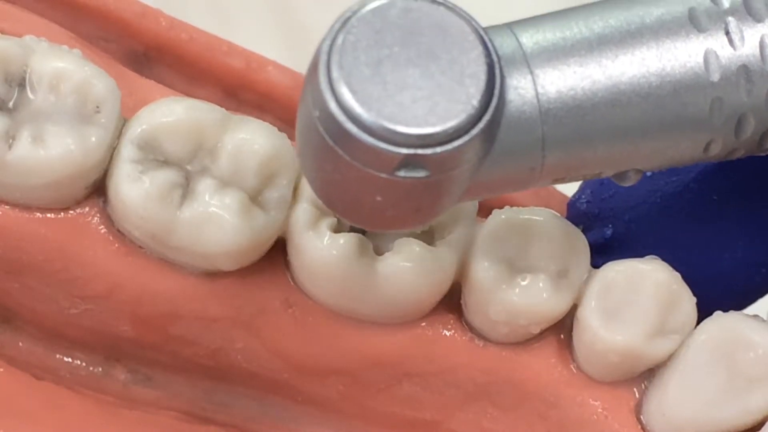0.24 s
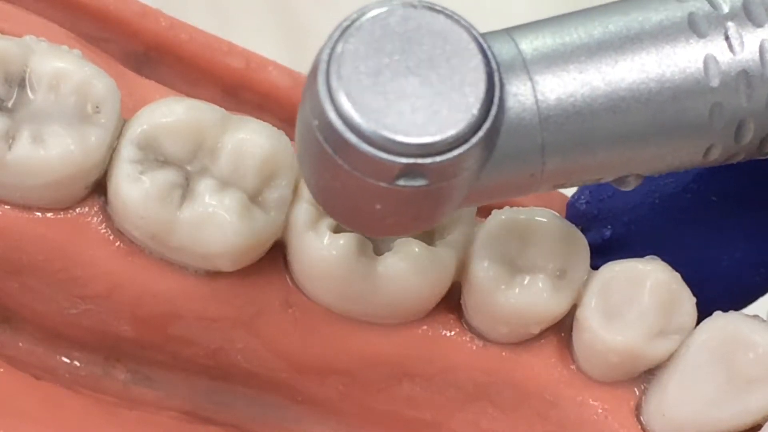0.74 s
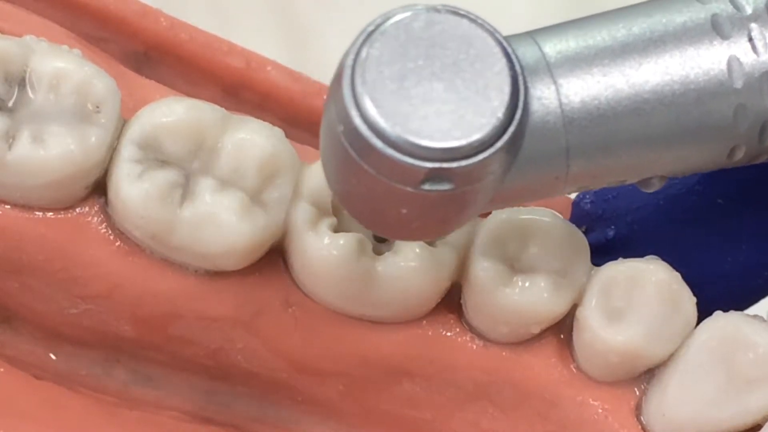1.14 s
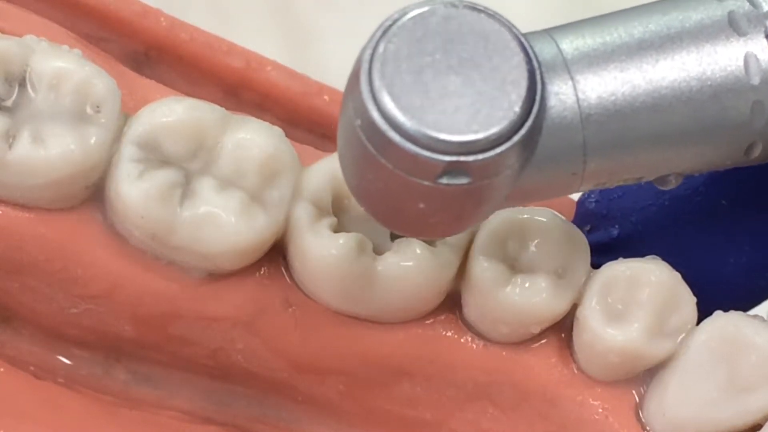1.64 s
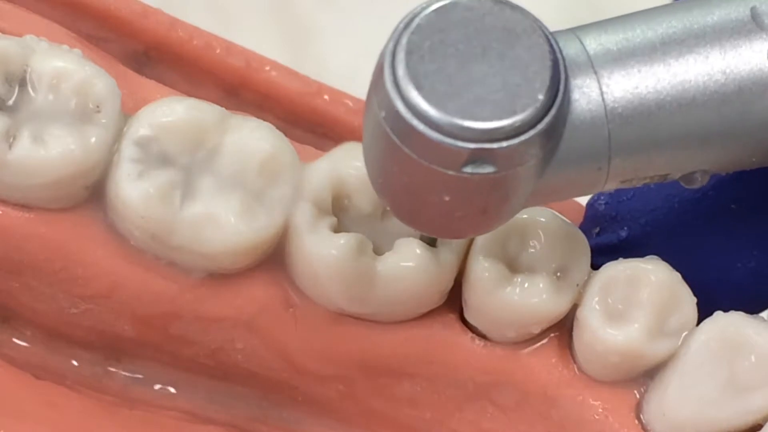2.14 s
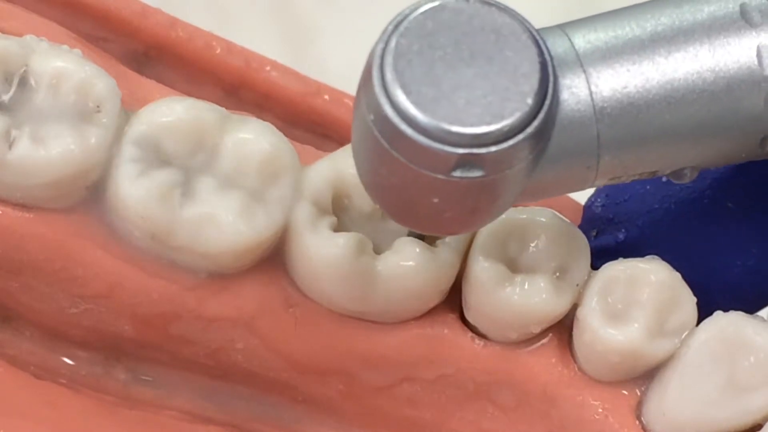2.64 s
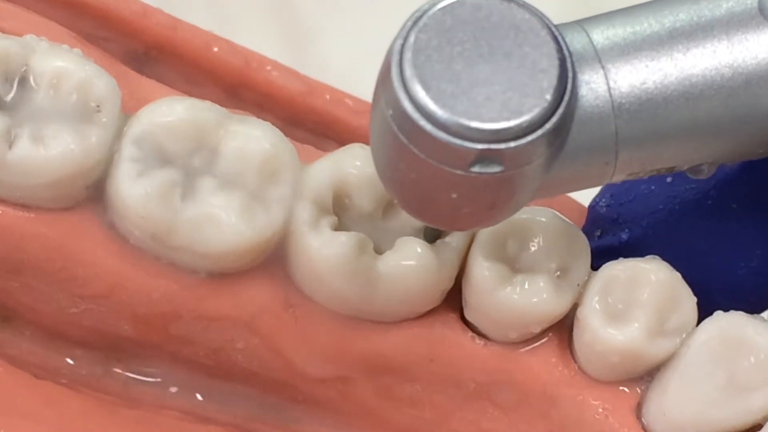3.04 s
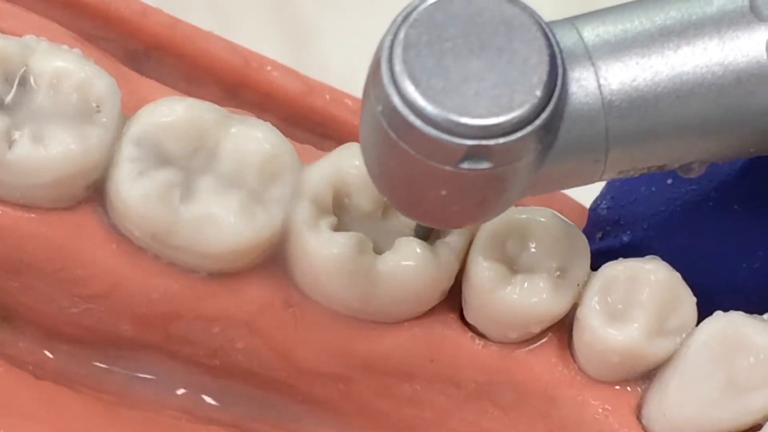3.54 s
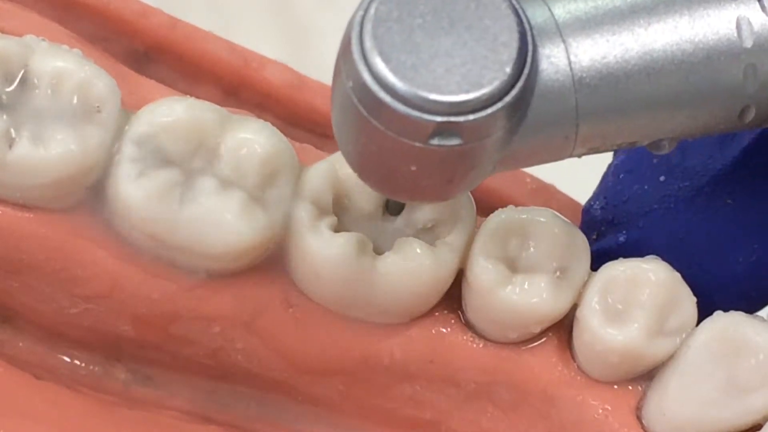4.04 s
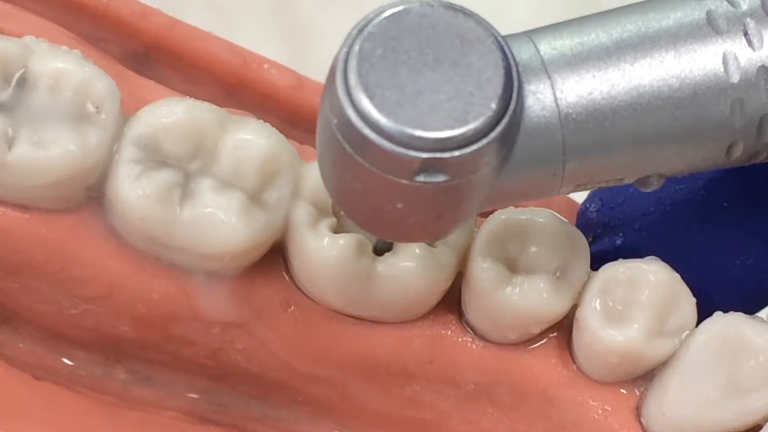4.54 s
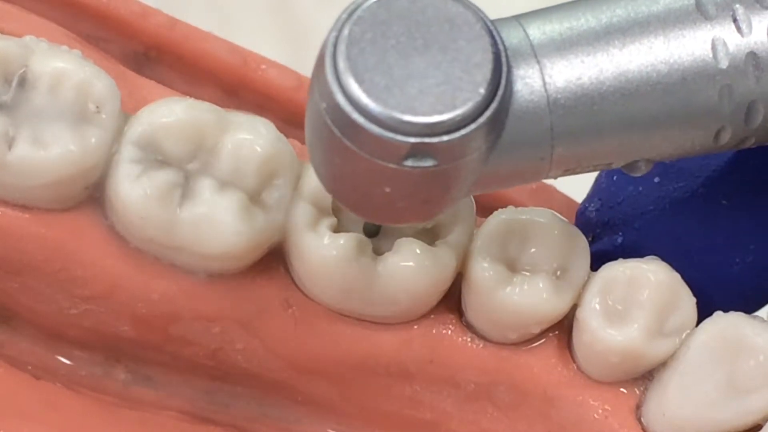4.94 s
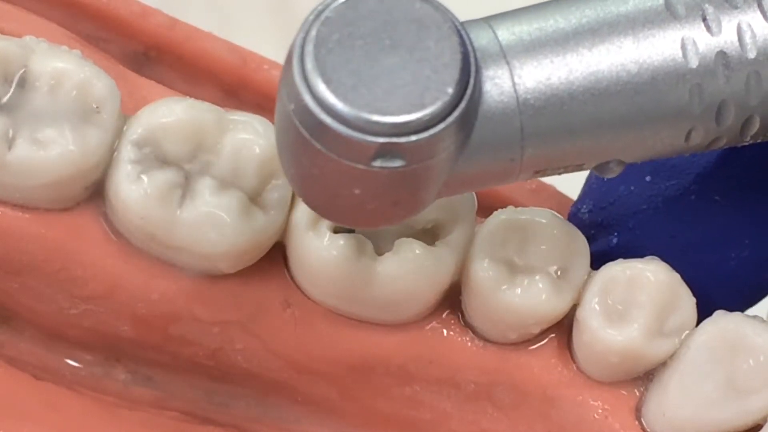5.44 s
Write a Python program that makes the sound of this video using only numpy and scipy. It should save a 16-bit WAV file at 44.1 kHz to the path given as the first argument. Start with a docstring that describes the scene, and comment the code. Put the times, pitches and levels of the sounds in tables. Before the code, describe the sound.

Close, wavering high whine of a dental handpiece over spray hiss, with two bright air blasts and bursts of thumping, crackling wind noise.

```python
"""Close beside a plastic tooth, ground by an electric dental handpiece: sines on multiples of the motor speed,
which sags under load, over shaped-noise hiss of bur and cooling spray. An air jet blows twice beside it:
bright noise, its stream buffeting the single microphone with low rumble, flutter and sharp pressure pulses.
Gain control ducks the whole mix when it is loud.
"""
import sys
import numpy as np
from scipy import signal
from scipy.fft import rfft, irfft
from scipy.io import wavfile
from scipy.ndimage import uniform_filter1d, minimum_filter1d

SR = 44100
rng = np.random.default_rng(int(sys.argv[2]) if len(sys.argv) > 2 else 0)


def put_to_file(sound):
    """Save the sound as 16-bit audio at rate SR, in the file named by the first command-line argument."""
    columns = np.atleast_2d(sound).T  # one column per channel
    safe = np.clip(columns, -1, 1)
    whole_steps = np.round(safe * 32767)
    wavfile.write(sys.argv[1], SR, whole_steps.astype(np.int16))


N = 250929

# Levels are set ahead of the microphone chain. Colours are relative density; the noise is scaled to rms 1.
# Slowly changing background air rumble on the microphone: t/s, rms level/dB
DRAUGHT = [(0, -34.5), (.65, -36), (.7, -44), (.8, -39), (1.3, -39.5), (1.7, -41), (2.0, -46.5),
           (2.34, -53), (3.0, -42), (3.2, -36), (3.6, -28), (4.1, -34), (4.4, -37), (5.0, -35), (5.69, -41)]
# Gusts of the stream across the microphone: middle t/s, length/s, rumble level/dB, flutter level/dB
GUSTS = [(0.081, 0.091, -35, -38), (0.338, 0.097, -28.5, -36), (0.461, 0.021, -29, -24.5),
         (.55, 0.028, -30, -35), (0.612, 0.072, -29.5, -44), (3.052, 0.025, -23, -39),
         (3.144, 0.073, -26.5, -33.5), (3.268, 0.016, -40, -15), (3.406, .1, -19, -28),
         (3.481, 0.038, -31, -28), (3.587, 0.064, -21, -34), (3.67, 0.11, -28, -30),
         (3.728, 0.053, -21, -14.5), (3.778, 0.07, -31, -16), (3.865, 0.028, -33, -29.5),
         (3.95, .05, -35, -24), (3.998, 0.12, -35, -31), (4.177, 0.041, -21.5, -20.5),
         (4.256, 0.082, -24, -19.5), (4.47, 0.046, -33, -34), (4.993, .04, -32.5, -47),
         (5.12, .06, -32.5, -54), (5.48, 0.079, -32.5, -49), (5.566, 0.092, -29, -44),
         (5.662, .08, -25, -28)]
# Rumble spectrum: f/Hz, density/dB
RUMBLE_COLOUR = [(15, -70), (25, -40), (35, -52), (51, -10.5), (97, 2), (160, -2), (464, -28), (500, -54),
                 (650, -59), (1100, -120)]
# Strongest eddies striking the diaphragm, ahead of venting: t/s, peak level/dB, nominal width/ms
POPS = [(.059, -8, 1.34), (0.067, -11.5, 0.57), (.099, -13, 0.74), (.124, -18, 1.1), (.155, -18, 0.63),
        (.204, -18.5, 0.43), (.247, -14.5, 1.28), (.306, -8, 0.54), (0.322, -11.5, 0.57), (.36, -10.5, 1.3),
        (0.37, -10.5, 0.52), (.46, -4.5, 0.6), (0.5, -15.5, 0.78), (.545, -13, 0.59), (.624, -5, 0.49),
        (3.05, -11, 1.09), (3.118, -19, 1.16), (3.134, -19, 1.8), (3.162, -0.5, 0.79), (3.263, -5, 0.85),
        (3.32, -14.5, 1.7), (3.353, -7.5, 0.94), (3.376, -15, 0.54), (3.395, -10, 0.64),
        (3.407, -0.5, 0.37), (3.415, -10, 0.52), (3.431, -1.5, 0.39), (3.48, -7, 1.22), (3.488, -7.5, 0.33),
        (3.564, -11, 0.63), (3.582, -5, 0.86), (3.604, -1, 0.32), (3.612, -7, 0.96), (3.638, -6, 0.75),
        (3.65, 4.5, .3), (3.665, -1, 0.63), (3.678, -3.5, 0.44), (3.707, -3, 0.35), (3.714, -1.5, 0.51),
        (3.718, -0.5, 0.37), (3.728, -18, 1.1), (3.736, -1.5, 0.48), (3.739, -15, .64), (3.747, -11, 0.42),
        (3.75, -7, 0.89), (3.759, -5, 0.2), (3.771, 2.5, 0.39), (3.777, 3, 0.65), (3.786, -0.5, 0.25),
        (3.795, -0.5, 0.74), (3.807, -12, 0.59), (3.816, -14, 0.55), (3.859, -8.5, .76), (3.932, -5, 1.04),
        (3.951, -20, 0.63), (3.958, -9, 0.55), (3.992, -8, 0.5), (4.014, -8, 0.74), (4.029, -9.5, 1.34),
        (4.054, -7, 0.39), (4.088, -15, 1.5), (4.155, -18, .95), (4.17, -7.5, 1.4), (4.188, 0, 0.21),
        (4.208, -17, .9), (4.223, -6, 0.38), (4.226, 6.5, 0.48), (4.233, -3, 0.88), (4.237, 2, 0.42),
        (4.242, -11, 0.66), (4.251, 1.5, 0.33), (4.263, -4, 0.33), (4.272, -9, 0.34), (4.276, 3, 0.4),
        (4.28, 3, 0.35), (4.285, 6.5, .2), (4.288, -1, 0.36), (4.46, -16.5, 1.2), (4.485, -36, 1.5),
        (5.562, -10.5, 1.08), (5.637, -4.5, 0.78), (5.649, -8, 1.66), (5.671, -2, .46), (5.688, 1.5, 0.43)]
# Air jet, one sub-table a blast: t/s, level/dB, extra level of its lower part/dB
JET_BLASTS = [
    [(0.0, -24, -1), (0.16, -21, -0.5), (0.647, -22, 2.5)],
    [(3.03, -21, 6), (3.07, -22, 1), (3.13, -22, 4.5), (3.78, -23, 0.5), (4.1, -22, 2), (4.33, -22.5, 3),
     (4.52, -20.5, 0.5), (5.61, -19.5, -4), (5.69, -19.5, -4)],
]
# Jet spectrum: f/Hz, density/dB
JET_COLOUR = [(1500, -32), (3000, -13), (5000, -9.5), (6500, -5.5), (8000, -8.5), (9600, -2), (11000, -1.5),
              (12500, 0.5), (14000, 0.5), (15000, -2), (16500, 11)]
# Bur and spray hiss, dipping as the jet shuts: t/s, rms level/dB
SPRAY_LEVEL = [(0, -33.5), (.5, -33), (.65, -36.5), (.76, -36.5), (.85, -34), (2.6, -34.5), (5.69, -31.5)]
# Spray spectrum: f/Hz, density/dB
SPRAY_COLOUR = [(150, -39), (250, -11), (324, -16.5), (379, -17), (1250, -14.5), (1960, -7), (2630, -8),
                (2910, -7), (3980, -6), (4650, -3), (6680, -8.5), (8370, -4.5), (9450, -10), (12900, -7.5),
                (15600, -8)]
# Motor speed, sagging as the bur bites, ahead of rotor smoothing: t/s, speed/(turns per s)
SPEED = [(0, 776), (.114, 845), (.21, 906), (.34, 962), (.44, 978), (.53, 965), (.575, 946), (.63, 951),
         (.75, 984), (.82, 987), (.92, 961), (1.12, 993), (1.21, 972), (1.29, 941), (1.45, 998),
         (1.59, 968), (1.79, 894), (2.03, 930), (2.15, 955), (2.25, 901), (2.33, 961), (2.43, 985),
         (2.56, 956), (2.64, 973), (2.72, 941), (2.86, 857), (2.96, 885), (3.03, 864), (3.16, 793),
         (3.24, 871), (3.3, 900), (3.35, 886), (3.425, 766), (3.53, 869), (3.62, 884), (3.75, 852),
         (3.84, 933), (3.94, 962), (4.04, 954), (4.105, 913), (4.17, 933), (4.3, 966), (4.53, 987),
         (4.69, 963), (5.21, 984), (5.28, 961), (5.385, 859), (5.45, 925), (5.52, 957), (5.57, 968),
         (5.635, 899), (5.69, 902)]
# Housing radiation: speed/(turns per s), rms level/dB of the tones at 2, 4 and 5 times motor speed
HOUSING = [(780, -35.5, -55, -37.5), (830, -35.5, -44, -31), (890, -35, -44, -37.5),
           (890, -37.5, -44.5, -37), (960, -33.5, -42.5, -36.5), (948, -33, -46, -38),
           (986.4, -31.5, -43.5, -39.5), (1022, -29.5, -64, -58)]
# Weak gear tones: multiple of motor speed, level/dB re second tone ahead of its fades
WEAK_TONES = [(3, -17.5), (6, -21.5), (7, -21)]
# Tones swelling briefly: middle t/s, length/s, multiple of motor speed, rms level/dB
SWELLS = [(.01, 0.063, 5, -39), (0.113, .1, 4, -44), (.15, .25, 6, -49), (.19, 0.14, 2.5, -44),
          (0.203, 0.17, 3, -49), (.28, 0.11, 10, -36), (.34, 0.072, 5, -42), (0.494, 0.14, 4, -40.5),
          (0.603, 0.067, 5, -31), (.62, 0.059, 10, -43), (0.896, 0.091, 5, -45), (1.264, 0.079, 5, -48),
          (1.5, .08, 10, -45), (1.553, 0.056, 5, -43), (1.675, 0.16, 5, -44), (1.95, .15, 10, -47),
          (2.2, .1, 10, -44), (2.54, .1, 10, -46), (2.64, 0.077, 2, -41), (2.74, .13, 7, -48),
          (3.07, 0.11, 5, -36), (3.073, 0.11, 10, -32), (3.1, 0.16, 6, -53), (3.25, 0.096, 4, -43),
          (3.313, 0.065, 7, -35), (3.418, 0.062, 4, -43), (3.31, 0.077, 5, -38), (3.39, 0.1, 5, -48),
          (3.508, .08, 15, -38), (3.53, 0.079, 4, -40), (3.6, .12, 7, -41), (3.66, .1, 15, -34),
          (3.7, 0.21, 5, -34), (3.94, 0.14, 4, -40), (4.092, .07, 5, -38), (4.546, 0.69, 4, -39),
          (4.697, 0.61, 5, -38.5), (5.276, 0.071, 5, -29.5), (5.29, 0.09, 10, -32), (5.31, .1, 15, -36),
          (5.33, .1, 7, -42), (5.39, 0.058, 5, -29), (5.615, 0.079, 5, -35), (5.616, .13, 6, -40),
          (5.63, 0.088, 4, -53)]
# Passing level changes of one tone: middle t/s, length/s, multiple of motor speed, loss/dB (negative = gain)
FADES = [(.23, .08, 5, 6), (.43, 0.055, 5, 8), (0.542, .04, 5, 8), (0.682, 0.18, 4, 10),
         (0.724, 0.098, 5, 11), (1.03, 0.12, 5, 12), (1.04, 0.11, 4, 8), (1.44, 0.14, 5, 10),
         (1.68, .1, 4, 3), (2.076, 0.058, 5, 5), (2.41, 0.11, 5, 14), (2.898, 0.33, 5, 6.5),
         (3.24, .06, 5, 3), (3.402, 0.064, 2, 4), (3.75, .12, 4, 6), (3.77, 0.21, 2, 4),
         (3.835, 0.061, 5, 1), (4.22, .18, 5, 0), (5.17, .12, 4, -1), (5.35, 0.086, 2, 5.5),
         (5.502, .1, 5, 12), (5.67, 0.074, 2, 1)]

FLUTTER_RE_DRAUGHT_DB = -16.5
JET_VALVE_S = 0.005  # opening or shutting time
INERTIA_S = 0.025  # the rotor rounds every change of speed
BITE_DB, BITE_SLOWING = 1.5, 560  # fifth-tone swing limit; speed-change scale, turns per s per s
THRESHOLD_DB, SQUEEZE = -26, 0.36  # SQUEEZE: dB cut per dB over
ATTACK_S, HOLD_S, RELEASE_DB_PER_S = 0.055, 0.06, 82
CUTOFF_HZ = 15720


def from_db(db):
    """Amplitude factor of a level in dB."""
    return 10 ** (np.asarray(db) / 20)


def rms_one(x):
    """Scale to rms 1."""
    return x / np.sqrt(np.mean(x ** 2) + 1e-20)


def in_time(rows):
    """Interpolate table columns against the first, t/s, to one value per sample."""
    t_s, *columns = np.transpose(rows)
    return [np.interp(np.arange(N) / SR, t_s, column) for column in columns]


def drift(corner_hz):
    """Slow chance: noise through a double one-pole low-pass, spread 1."""
    step = 40  # samples per slow value
    pole = np.exp(-2 * np.pi * corner_hz * step / SR)
    noise = rng.standard_normal(N // step + 2002)
    slow = signal.lfilter([1], [1, -2 * pole, pole * pole], noise)[2000:]  # drops the settling
    return np.interp(np.arange(N) / step, np.arange(len(slow)), rms_one(slow))


def coloured(colour):
    """White noise shaped to a spectrum, log-frequency interpolation; rms 1."""
    f_hz, density_db = np.transpose(colour)
    bins_hz = np.maximum(np.fft.rfftfreq(N, 1 / SR), 1)
    shape_db = np.interp(np.log(bins_hz), np.log(f_hz), density_db, left=-90, right=-90)
    return rms_one(irfft(rfft(rng.standard_normal(N)) * from_db(shape_db), N))


def low_pass(x, hz, order=2):
    """Butterworth low-pass."""
    return signal.sosfilt(signal.butter(order, np.clip(hz, 20, 15000), fs=SR, output="sos"), x)


def high_pass(x, hz, order=2):
    """Butterworth high-pass."""
    return signal.sosfilt(signal.butter(order, hz, "high", fs=SR, output="sos"), x)


def buffeting():
    """Air on the microphone: lumpy rumble, and a faster flutter of small eddies, both raised by gusts."""
    t_s = np.arange(N) / SR
    draught_db, = in_time(DRAUGHT)
    rumble_gain = from_db(draught_db)
    flutter_gain = from_db(draught_db + FLUTTER_RE_DRAUGHT_DB)
    for middle_s, length_s, rumble_db, flutter_db in GUSTS:
        gust = np.exp(-(2 * (t_s - middle_s) / length_s) ** 4)
        rumble_gain = np.maximum(rumble_gain, gust * from_db(rumble_db))
        flutter_gain = np.maximum(flutter_gain, gust * from_db(flutter_db))
    small_eddies = (rng.random(N) < 800 / SR) * rng.standard_normal(N)  # about 800 per s
    flutter = rms_one(low_pass(high_pass(small_eddies, 180, order=1), 423))
    rumble = from_db(1.37 * drift(47)) * coloured(RUMBLE_COLOUR)
    return rumble_gain * rumble + flutter_gain * flutter


def eddies(at_s, peaks, widths_ms):
    """Each eddy is a bell-shaped pressure pulse, width taken at half height."""
    out = np.zeros(N + 400)
    reach = np.arange(-200, 200)
    for t_s, peak, width_ms in zip(at_s, peaks, widths_ms):
        at = np.clip(round(t_s * SR) + reach, 0, N + 399)
        out[at] += peak * np.exp(-4 * np.log(2) * (reach / (width_ms * SR / 1000)) ** 2)
    return out[:N]


def pops():
    """A sharp suction, a rebound of the other sign, then two trailing eddies of either sign."""
    t_s, peak_db, width_ms = np.transpose(POPS)
    peak = from_db(peak_db)
    chance = rng.random((len(POPS), 7))
    out = eddies(t_s, -peak, 0.87 * width_ms)
    rebound = peak * (0.2 + 0.31 * chance[:, 0])
    out += eddies(t_s + 1.3e-3 * width_ms, rebound, 0.42 * width_ms)
    for lag, draws in ((2.4e-3, chance[:, 1:4]), (4.5e-3, chance[:, 4:7])):  # lag: s per ms of width
        after, size, spread = draws.T
        trail_s = t_s + width_ms * (lag + 0.0023 * after)
        out += eddies(trail_s, peak * 0.8 * (2 * size - 1), width_ms * (0.61 + 0.69 * spread))
    vented = high_pass(out, 110)  # slow pressure escapes through the vent
    return low_pass(vented, 2900, order=4)


def air_jet():
    """Bright hiss while the valve is open; its lower part rises and falls separately, by table and slow chance."""
    t_s = np.arange(N) / SR
    gain, lower_db = np.zeros(N), np.zeros(N)
    for blast in JET_BLASTS:
        opened = np.clip(1 + (t_s - blast[0][0]) / JET_VALVE_S, 0, 1)
        not_shut = np.clip(1 + (blast[-1][0] - t_s) / JET_VALVE_S, 0, 1)
        blast_db, blast_lower_db = in_time(blast)
        gain += opened * not_shut * from_db(blast_db)
        lower_db += opened * not_shut * blast_lower_db
    hiss = coloured(JET_COLOUR)
    lower_gain = from_db(lower_db + 1.1 * drift(3.3))
    hiss += (lower_gain - 1) * low_pass(hiss, 12000, order=1)
    return gain * from_db(0.2 * drift(30)) * hiss


def spray():
    """Smooth hiss of the cutting bur and its cooling mist: shaped noise, level drifting slightly."""
    level_db, = in_time(SPRAY_LEVEL)
    return from_db(level_db + 0.75 * drift(30)) * coloured(SPRAY_COLOUR)


def bell(t_s, middle_s, length_s):
    """Gaussian of peak 1; length spans the 1/e points."""
    return np.exp(-4 * ((t_s - middle_s) / length_s) ** 2)


def fading_db(multiple):
    """Summed loss of one tone over its fades."""
    t_s = np.arange(N) / SR
    return sum(loss_db * bell(t_s, middle_s, length_s)
               for middle_s, length_s, k, loss_db in FADES if round(k) == multiple)


def rotor_smooth(x):
    """Rotor inertia as a moving average."""
    return uniform_filter1d(x, max(int(INERTIA_S * SR), 1), mode="nearest")


def gear_tones():
    """Sines locked to the motor turn; the housing sets their strength, the bite of the bur swells the fifth."""
    speed = rotor_smooth(in_time(SPEED)[0])
    housing_speed, *housing_db = np.transpose(HOUSING)
    second_db, fourth_db, fifth_db = [np.interp(speed, housing_speed, db) for db in housing_db]
    slowing = -rotor_smooth(np.gradient(speed) * SR)
    fifth_db = fifth_db + BITE_DB * np.tanh(slowing / BITE_SLOWING)
    turn_rad = 2 * np.pi * np.cumsum(speed * (1 + 0.00107 * drift(30))) / SR

    second_gain = from_db(second_db - fading_db(2) + 1.3 * drift(8.6))
    fourth_gain = from_db(fourth_db - fading_db(4) + 2.0 * drift(32) + 1.7 * drift(2.5))
    fifth_gain = from_db(fifth_db - fading_db(5) + 1.4 * drift(37) + 0.54 * drift(14))
    out = second_gain * np.sin(2 * turn_rad)
    out += fourth_gain * np.sin(4 * turn_rad)
    out += fifth_gain * np.sin(5 * turn_rad)
    for multiple, relative_db in WEAK_TONES:
        weak_gain = from_db(second_db + relative_db + 1.2 * drift(6.4) + 3.75 * drift(50))
        out += weak_gain * np.sin(round(multiple) * turn_rad)

    t_s = np.arange(N) / SR
    for middle_s, length_s, multiple, level_db in SWELLS:
        near = abs(t_s - middle_s) < 2 * length_s
        swell = from_db(level_db) * bell(t_s[near], middle_s, length_s)
        half_step = round(2 * multiple) / 2  # multiples come in halves
        out[near] += swell * np.sin(half_step * turn_rad[near])
    return np.sqrt(2) * out  # rms levels to sine peaks


def scene():
    """Sum of all sources, the same on both channels."""
    mono = buffeting() + pops() + air_jet() + spray() + gear_tones()
    return np.array([mono, mono])


def gain_control(x):
    """Level followed, held, let go at a steady rate; the excess over threshold is eased in and squeezed."""
    power = uniform_filter1d(x ** 2, size=1323, origin=661)  # past 30 ms
    level_db = 10 * np.log10(power + 1e-12)
    hold = 2 * int(HOLD_S * SR / 2) + 1
    held_db = -minimum_filter1d(-level_db, hold, origin=hold // 2)  # running maximum
    ramp_db = RELEASE_DB_PER_S * np.arange(N) / SR
    released_db = np.maximum.accumulate(held_db + ramp_db) - ramp_db
    over_db = np.maximum(released_db - THRESHOLD_DB, 0)
    pole = np.exp(-1 / (ATTACK_S * SR))
    start = [over_db[:2000].mean()]
    eased_db = signal.lfilter([1 - pole], [1, -pole], over_db, zi=start)[0]
    return from_db(-SQUEEZE * eased_db)


def record(dry):
    """The microphone drops the deep bass, the gain control ducks, peaks are rounded, the top is cut."""
    x = high_pass(dry, 45)
    sensed = x[0] - 0.35 * low_pass(x[0], 1500, order=1)  # it listens less to the bass
    x = x * gain_control(sensed)
    rounded = 0.75 * np.tanh(x / 0.75)
    top_cut = signal.ellip(14, 0.3, 75, CUTOFF_HZ, fs=SR, output="sos")  # ripple/dB, stopband/dB
    return signal.sosfilt(top_cut, rounded)


dry = scene()
out = record(dry)
put_to_file(out)
```